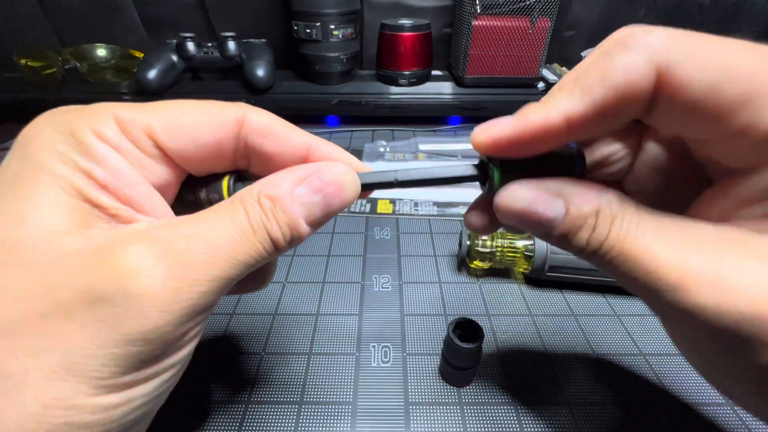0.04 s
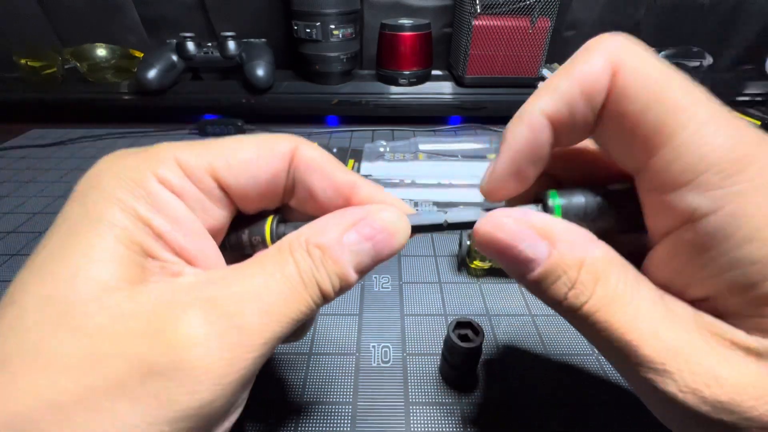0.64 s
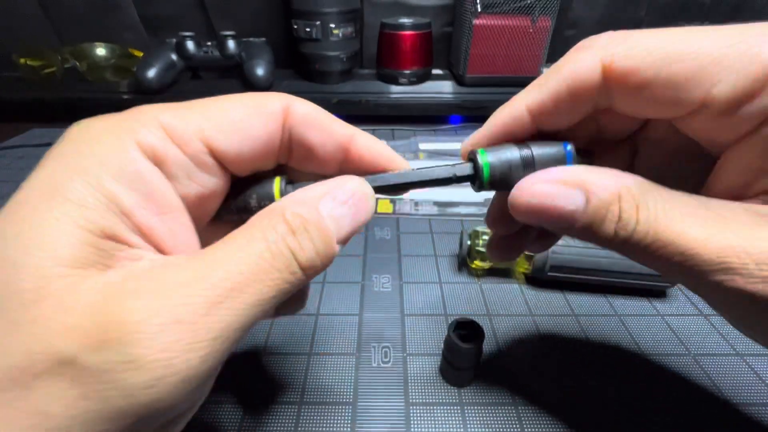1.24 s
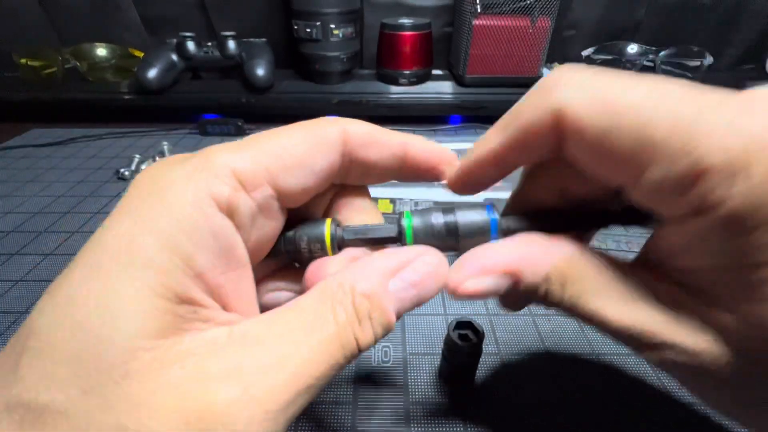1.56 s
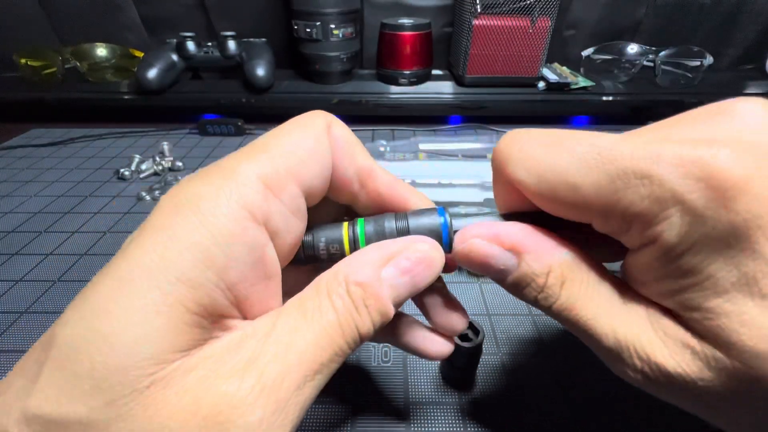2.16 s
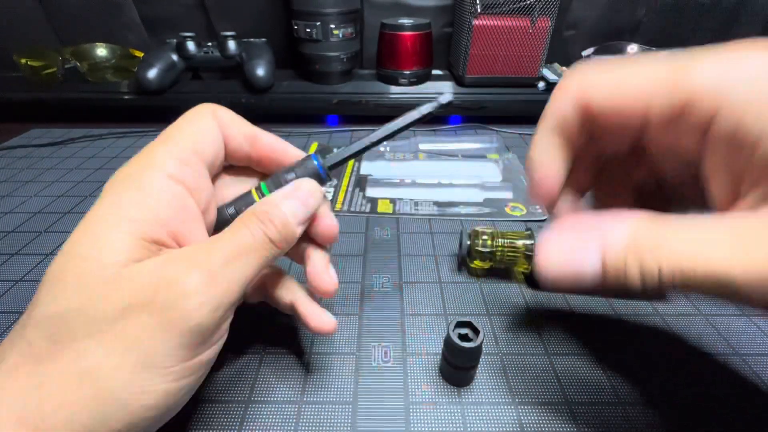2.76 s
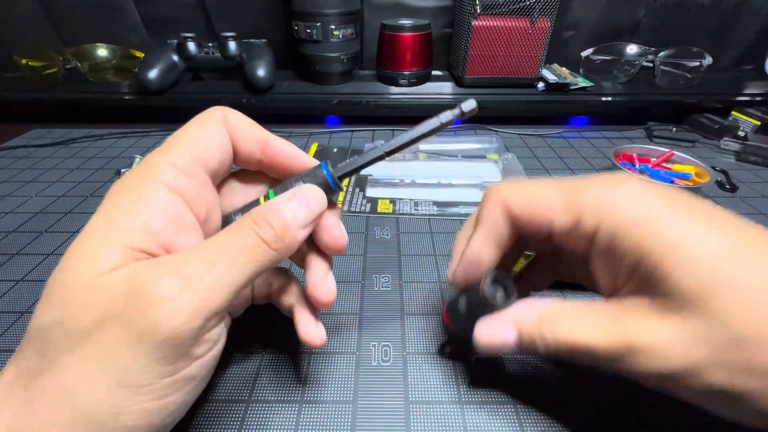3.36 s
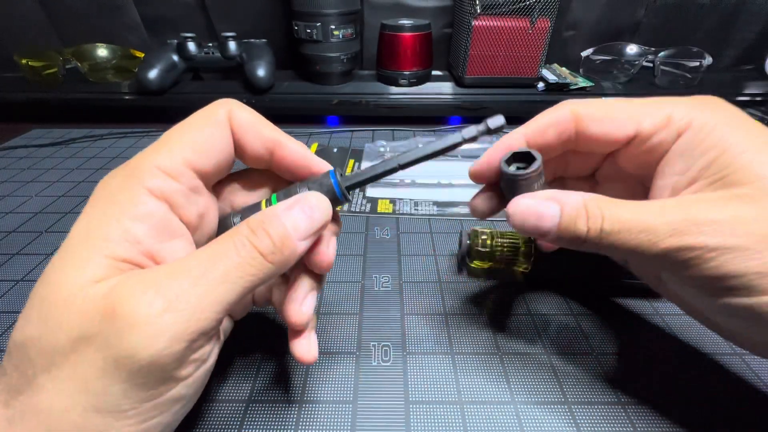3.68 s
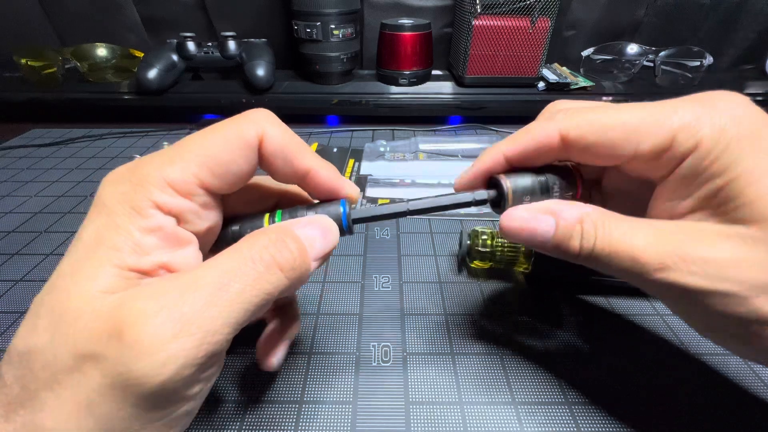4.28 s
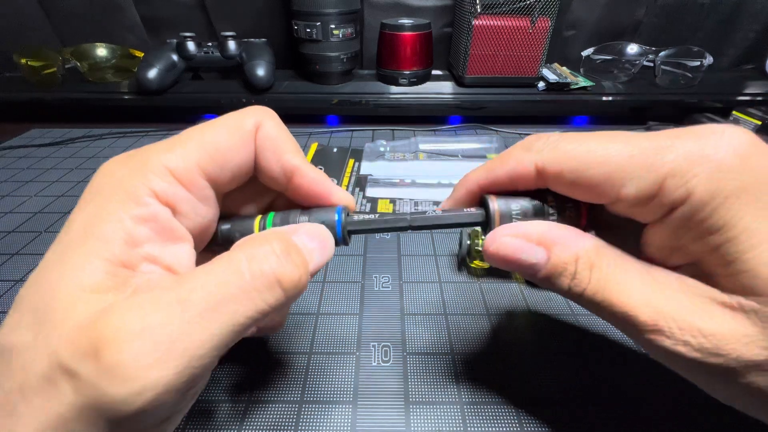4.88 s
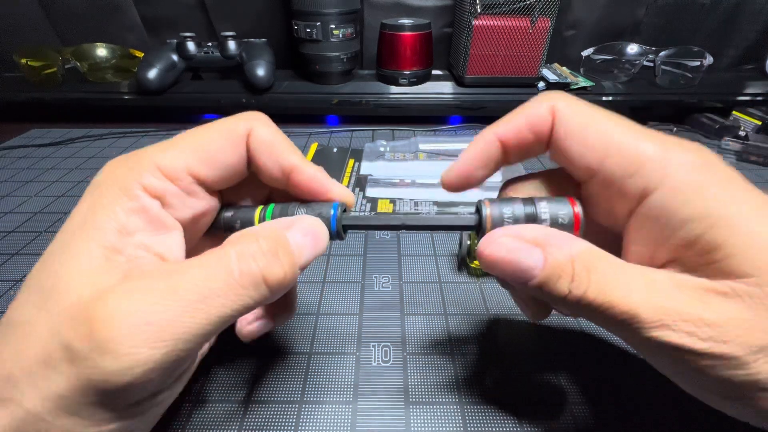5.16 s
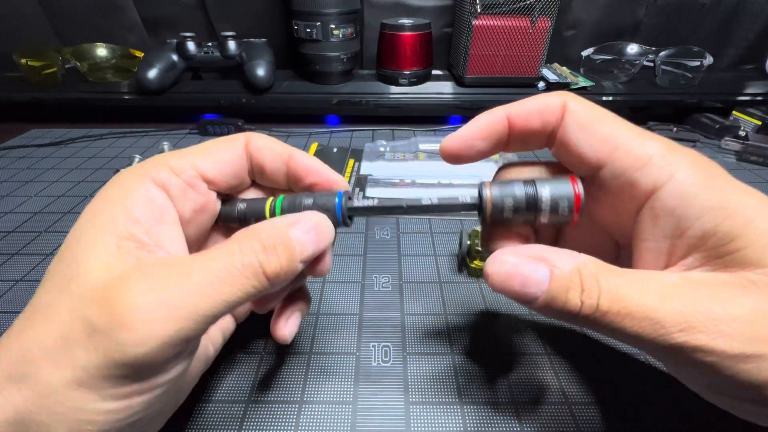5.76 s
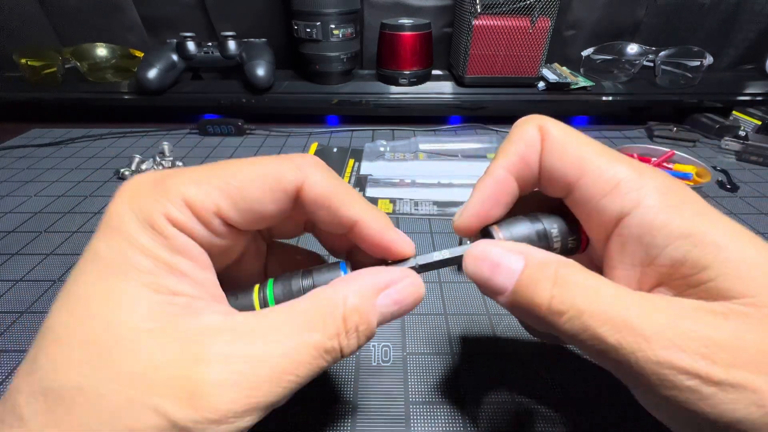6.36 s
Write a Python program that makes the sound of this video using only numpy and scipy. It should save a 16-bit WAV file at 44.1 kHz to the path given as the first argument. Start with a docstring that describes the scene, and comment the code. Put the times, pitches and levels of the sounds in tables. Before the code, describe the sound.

Small steel sockets click, scrape and snap off and onto a metal shaft, close up, over a faint fan hum.

```python
"""Close microphone, small room: steel sockets are pulled off and pushed onto a hex shaft just above a desk.
A click and a grainy, faintly ringing slide open; at 0.75 s a hard snap leaves the loose parts buzzing
and the desk shaking. More slides and snaps follow, each ring damped at once by the fingers. After 3.1 s
the large socket is in hand: it scrapes over the shaft tip near 4 s and snaps on near 4.75 s. Light
clicks, a last slide and a shake of the desk come just after 6 s. A fan hums faintly throughout."""
import sys
import numpy as np
from scipy import signal
from scipy.fft import rfft, irfft, next_fast_len
from scipy.io import wavfile
from scipy.ndimage import uniform_filter1d, map_coordinates

SR = 44100
rng = np.random.default_rng(int(sys.argv[2]) if len(sys.argv) > 2 else 0)


def materialize(psi):
    """Save the field psi as 16-bit PCM at rate SR to the path in sys.argv[1].

    A 1-D psi becomes a single channel; in a 2-D psi each row is a channel.
    """
    bounded = np.clip(np.atleast_2d(psi).T, -1, 1)
    quanta = np.round(bounded * 32767).astype(np.int16)
    wavfile.write(sys.argv[1], SR, quanta)


N = 283122


# steel striking steel, close to the microphone: t/s, chatter length/s, relative level/dB, body/dB,
# treble tilt/(dB per octave), ping f/Hz, its lift/dB, second ping f/Hz, its lift/dB
CONTACTS = [(.0066, 0.0015, 2, -2, -9.5, 2240, 14.5, 5000, 6),
            (0.018, 0.0039, -10.5, -7.5, -23, 11200, 23, 5270, -1),
            (0.227, 0.00089, -48, 2, 0, 10770, 16, 8500, 6), (0.364, .003, -29, 8, -14, 5940, 12, 3440, 4),
            (0.5144, .0029, -22, 4, -2, 2400, 7.5, 6330, 14.5),
            (0.7453, .0007, 10, -11.5, -6.5, 15000, 13, 5000, 3),
            (0.7474, .0016, -4.5, 1, -1, 4900, -2, 2600, -5), (.7497, .0018, -6, 2, -9, 2500, 2, 10400, 15),
            (0.7523, 0.0007, -0.5, -4, -4, 6900, 13, 14000, 16),
            (0.7553, .0032, -7, 1.5, -7, 1610, 5, 10800, 8),
            (0.7655, 0.0022, -12.5, 0.5, -8, 6400, 15, 1410, 0),
            (0.7708, .0022, -12.5, -1, -9, 6200, 15, 3010, 10),
            (0.7793, .003, -23, 2, -10, 2640, 6, 5600, 6), (0.786, .003, -22, 3.5, -7, 3010, 4, 6860, 8),
            (1.19, .0018, -39, 2, -15.5, 5310, 7.5, 3000, -3),
            (1.368, 0.002, -4, -3, 1, 10740, 15.5, 11830, 0),
            (1.3692, 0.00053, 4, -21, -7, 4430, 9, 5900, 8.5),
            (1.7653, .002, -38.5, 4.5, -14.5, 5000, 14, 6790, 6.5),
            (2.0608, 0.0013, -1.5, -20.5, -2.5, 10770, 16.5, 4230, 10.5),
            (2.0612, .003, -8.5, -4, -10, 1220, 23.5, 6750, 16),
            (2.105, 0.0022, -9.5, -10.5, -6, 4300, 8, 6300, 9),
            (2.177, 0.0016, -36.5, 10, -23, 5770, 17, 3000, -5),
            (2.203, .003, -37, 10.5, -20, 5000, 14, 3400, -6.5),
            (2.242, .004, -29, 10.5, -13, 4700, 7, 6500, 5), (2.291, .0043, -23, 9, -20, 5270, 6, 11500, 1),
            (2.336, .0029, -16.5, 3, -24, 4500, -1, 11900, 3),
            (2.372, 0.0062, -14, 8, -22.5, 4170, -3, 11950, 16.5),
            (2.484, .002, -35.5, -2.5, -2, 2540, 4, 6000, 8),
            (2.509, .0024, -29.5, 4.5, -8, 4970, 11, 6500, 0),
            (2.548, 0.00089, -32.5, 14, -0.5, 2480, 3, 7000, -2),
            (2.984, .003, -45.5, -2.5, -11, 6200, 17, 4000, 1),
            (3.23, 0.0079, -39.5, 13, -19.5, 3400, 13, 5250, 4),
            (3.25, 0.0084, -43.5, 12.5, -22, 3290, 11.5, 5200, 4),
            (3.6992, .0014, -36, 4.5, -24, 2150, 12, 4000, 11),
            (3.726, 0.0016, -47, -3.5, -8.5, 9000, 16, 4300, 3),
            (3.805, 0.0016, -22.5, -6.5, -14, 5190, 2, 3900, 9),
            (3.853, 0.0015, -25.5, -14, -30, 5420, 6, 3900, -4),
            (4.108, .0023, -21.5, -8, -19.5, 5400, 12, 3300, -2),
            (4.1642, .0018, -23, -7, -28, 5400, 4, 3780, 8),
            (4.231, 0.0018, -15.5, -7.5, -13, 2900, 7, 8200, 10.5),
            (4.4294, 0.0018, -18.5, -5, -8.5, 3420, 9.5, 9640, 9),
            (4.676, .0049, -29, 11, 0, 2470, 9, 3100, 9),
            (4.738, 0.0055, -18.5, -17, -4.5, 3200, 17.5, 13800, 14),
            (4.7402, 0.006, -19, 5, -16, 4530, 11, 6660, 12),
            (4.751, .007, -24.5, 6.5, -9, 4600, 10, 6550, -1),
            (4.7632, 0.0024, -13, 5, -24, 2270, 10, 10800, 26),
            (4.7685, 0.0031, -19, 7.5, -6, 880, 11.5, 2340, 13.5),
            (4.839, 0.0018, -29, 2, -16, 4540, 9, 9600, 13),
            (6.1295, 0.0032, -31.5, -3, -5, 6400, 13, 4200, 1.5),
            (6.134, 0.0016, -27, 5, -5, 6150, 18, 4300, 1.5),
            (6.2107, 0.0025, -41, 12.5, -1, 2900, 17.5, 7000, 7)]
# colour of a plain contact: f/Hz, level/dB
CONTACT_COLOUR = [(250, -9.5), (1100, -1), (2400, -6.5), (5000, -4.5), (11000, -0.5), (15000, -4.5)]
# resonances of the small sockets and of the large one: f/Hz, width/Hz, lift/dB
SMALL_SOCKET_MODES = [(1200, 450, 0.5), (2410, 610, 8.5), (3130, 260, 7.5), (4500, 700, 5),
                      (5400, 490, 4.5), (6660, 270, 1.5), (8800, 800, 3.5), (11400, 650, 2),
                      (15600, 1600, 10.5)]
LARGE_SOCKET_MODES = [(915, 430, 7), (2376, 640, 13), (3300, 380, 7.5), (4200, 560, -0.5), (5000, 420, 8),
                      (5400, 390, 3), (6850, 740, 8), (8830, 460, 4.5), (9600, 550, 8), (10800, 550, 4.5),
                      (15200, 1100, 18)]
LARGE_FROM_S = 3.1  # the large socket is picked up
BODY_FULL_HZ, BODY_GONE_HZ, TILT_FROM_HZ = 1270, 4860, 5400
PING_Q, FINGER_DAMP_HZ = 7.5, 170  # the fingers widen every ping
PING_CARRY = 0.35  # share of a ping's lift that carries into the room


def clicks(size=2048, bounce_db=-21, bounce_t60=0.056, level_db=-1):
    """Tiny collisions, then a weak rattle, ring the damped steel: heard close, and sent into the room."""
    tracks = np.zeros((2, N))
    hz = np.fft.rfftfreq(size, 1 / SR)
    lead = size // 8 / SR
    t = np.maximum(np.arange(size) / SR - lead, 0)
    window = signal.windows.tukey(size, 1 / 5)
    small_db, large_db = mode_lift(hz, SMALL_SOCKET_MODES), mode_lift(hz, LARGE_SOCKET_MODES)
    body = along([(BODY_FULL_HZ, 1), (BODY_GONE_HZ, 0)], hz)
    octaves = np.log2(np.maximum(hz / TILT_FROM_HZ, 1))
    for s, length, db, body_db, tilt_db, hz1, lift1, hz2, lift2 in CONTACTS + ticks():
        u = 2 * t / length
        blow = (u * np.exp(1 - u)) ** 2
        rattle = (1 - np.exp(-u)) * amp(bounce_db - 60 * t / bounce_t60)
        burst = rfft((blow + rattle) * rng.standard_normal(size))
        # the collisions ripple the spectrum finely but spread their energy evenly over it
        burst /= np.sqrt(abs(uniform_filter1d(abs(burst) ** 2, size=28)) + 1e-12)
        colour_db = along(CONTACT_COLOUR, hz) + body_db * body + tilt_db * octaves
        socket_db = large_db if s > LARGE_FROM_S else small_db
        # the point of contact decides which modes stand out
        pings = [(f, f / PING_Q + FINGER_DAMP_HZ, lift) for f, lift in ((hz1, lift1), (hz2, lift2))]
        ping_db = mode_lift(hz, pings)
        for track, share in zip(tracks, (1, PING_CARRY)):
            click = irfft(burst * causal(amp(colour_db + socket_db + share * ping_db)))
            add(track, s - lead, amp(db + level_db) * click * window)
    return tracks


# a socket slides along the shaft or rebounds from a snap: fastest at t/s, rise/s, fall/s,
# rub level/dB, relative hiss/dB, ring f/Hz, ring over rub/dB
STROKES = [(0.345, 0.076, 0.066, -64, -0.5, 5800, -25), (.43, 0.09, 0.083, -75.5, -4, 5230, -9.5),
           (.535, 0.053, 0.15, -72.5, -14.5, 6520, -4), (.881, 0.049, 0.061, -64, -20.5, 4400, -8.5),
           (1.06, .15, .3, -72.5, -3, 7204, -11), (1.352, .045, .02, -58.5, -6, 4550, 2),
           (1.358, 0.039, 0.028, -53, 9, 11000, 3.5), (1.387, 0.0093, 0.036, -48.5, -2.5, 5000, -6),
           (1.62, 0.3, 0.2, -78, -1.5, 4180, -4), (1.779, 0.097, .092, -73, -4.5, 4500, -9),
           (1.94, 0.078, .08, -67, -4.5, 7250, -6), (2.045, 0.12, 0.09, -61.5, -1, 7000, -1),
           (2.085, 0.0096, .052, -51.5, -11.5, 4370, -4), (2.2, 0.092, 0.32, -75, -25, 4400, -2.5),
           (2.389, 0.11, 0.049, -70, -20.5, 2500, -3), (2.56, .078, 0.13, -66.5, -6.5, 4420, -10.5),
           (3.58, .06, 0.047, -81.5, 3, 4380, -3), (3.675, .05, 0.11, -74, -7, 4380, -1),
           (4.249, 0.15, 0.18, -72, -15, 5500, -7), (4.451, 0.071, 0.07, -74.5, -7, 7170, -7.5),
           (4.672, 0.034, 0.12, -69.5, -2.5, 6850, -0.5), (4.701, 0.093, 0.12, -74, -13.5, 2350, 10),
           (4.756, 0.018, 0.023, -51.5, 2.5, 4560, -4), (4.99, .11, 0.14, -71.5, -6.5, 2324, -2.5),
           (6.165, .056, 0.21, -68, -5, 6250, -10), (6.3, 0.13, 0.1, -68.5, -8, 5670, -14.5)]
# spectra of the rub and of its high hiss: f/Hz, level/dB
RUB_SPECTRUM = [(1470, -31.5), (2500, 2.5), (3230, -8.5), (3520, -1.5), (4400, -3), (5970, 0), (7060, -2.5),
                (10000, -5), (13000, -45), (22000, -120)]
HISS_SPECTRUM = [(8000, -23.5), (10000, -8.5), (11400, -9), (13600, -15), (15300, -3), (16500, -20.5)]
# free ringing of the long shaft: f/Hz, width/Hz, level/dB
SHAFT_MODES = [(2150, 34, -2), (2977, 35, 1), (4520, 30, -2.5), (5080, 85, 1.5), (6440, 30, -3.5),
               (6430, 30, -3), (7000, 86, -5.5)]


def sliding(grain_db=1.5, jerk_db=1.5, uneven_db=2.5, hiss_db=0.5, shaft_db=-8, ring_q=9):
    """Steel rubs along steel in a jerky push; roughness makes it grainy, socket and shaft ring faintly."""
    rub, hiss, ring = np.zeros((3, N))
    for s, rise, fall, db, sheen_db, ring_hz, ring_db in STROKES:
        stroke = swell(s, rise, fall, db)
        rub = np.maximum(rub, stroke)
        hiss = np.maximum(hiss, stroke * amp(sheen_db))
        ring += friction_ring(stroke * amp(ring_db), ring_hz, ring_hz / ring_q)
    grain = unit(amp(grain_db * wobble(900) + jerk_db * wobble(230) + uneven_db * wobble(45)))
    steel = noise(RUB_SPECTRUM) + amp(shaft_db) * ringing(noise(RUB_SPECTRUM), SHAFT_MODES)
    return grain * (rub * steel + amp(hiss_db) * hiss * noise(HISS_SPECTRUM) + ring)


def ticks(length_s=0.0018, rub_cap_db=-68, over_rub_db=25, scatter_db=1, ping_hz=5000):
    """Each sliding stroke catches once along its way: faint contacts, in rows like CONTACTS."""
    rows = []
    for s, rise, fall, db, _, ring_hz, _ in STROKES:
        when, strength = rng.standard_normal(2)
        catch_s = s + np.tanh(when) * (fall if when > 0 else rise) / 2
        tick_db = min(db, rub_cap_db) + over_rub_db + scatter_db * strength
        rows.append((catch_s, length_s, tick_db, 0, -6, ping_hz, 4, ring_hz, 4))
    return rows


# the socket's mouth slips on the shaft tip: t/s, rise/s, relative level/dB, lowest mode/dB, pitch ratio
SCRAPES = [(3.822, 0.011, -55.5, 3.5, 0.97), (3.858, 0.014, -54, 1.5, .995), (3.88, 0.019, -60.5, -1, 1),
           (3.955, .028, -74, 4.5, 1.018), (4.008, .012, -68, 10, 1), (4.028, .012, -60, 1, 0.97),
           (4.082, 0.0067, -63.5, 8, .975), (4.091, .005, -48, -2, .985), (4.104, .008, -46, -6, .99),
           (4.121, 0.014, -56, -13, 1), (4.155, 0.02, -62, -7, 0.96)]
# the singing rim: f/Hz, width/Hz, level/dB
RIM_MODES = [(3900, 710, -3), (4730, 2500, -10), (5500, 140, -3.5), (6800, 900, -21.5),
             (11500, 1100, -24.5)]
# its dry rasp: f/Hz, level/dB
GRIT_SPECTRUM = [(1500, -24.5), (2600, -4.5), (3400, 0), (5200, -3.5), (7500, -9.5), (10000, -13),
                 (15000, -32)]


def scraping(grain_db=4, level_db=-3, grit_db=-11, grit_grain_db=1.5, fall_over_rise=1.63):
    """The rim catches and slips: dry rasps with a short ring whose pitch and balance follow the grip."""
    slips = np.zeros(N)
    grit = amp(grit_db) * unit(noise(GRIT_SPECTRUM) * amp(grit_grain_db * wobble(1100)))
    for s, rise, db, lowest_db, pitch in SCRAPES:
        pressure = swell(s, rise, fall_over_rise * rise, db + level_db)
        slips += pressure * grit
        for k, (hz, width, mode_db) in enumerate(RIM_MODES):
            slips += friction_ring(pressure * amp(mode_db + lowest_db * (k == 0)), pitch * hz, width)
    return slips * unit(amp(grain_db * wobble(400)))


# chatter of the loose steel: f/Hz, level/dB
BUZZ_SPECTRUM = [(250, -18), (550, -2.5), (1000, -4.5), (1400, -3), (2000, -10.5), (2700, -1.5),
                 (3700, -3.5), (6300, -0.5), (9000, -3), (12000, -12), (16000, -19)]
HARD_SNAP_S = 0.753


def buzzing(level_db=-33, t60=0.21, rise=0.009, shaft_db=-6, grain_db=3.5, rattle_db=0.5):
    """After the hard snap the loose parts chatter in quick clumps, keep the shaft ringing, and settle."""
    t = np.maximum(np.arange(N) / SR - HARD_SNAP_S, 0)
    chatter = unit(noise(BUZZ_SPECTRUM) * amp(grain_db * wobble(600) + rattle_db * wobble(170)))
    fade = (1 - np.exp(-t / rise)) * amp(level_db - 60 * t / t60)
    return fade * (chatter + amp(shaft_db) * ringing(chatter, SHAFT_MODES))


# the socket against the fingers: f/Hz, level/dB
SETTLE_SPECTRUM = [(200, -7), (400, 3), (700, -1.5), (1400, -2), (2200, -6), (3100, -4.5), (5000, -13.5),
                   (9000, -30), (16000, -49)]


def settling(delay=0.125, rise=0.082, fall=0.032, level_db=-58, rattle_db=3):
    """As the buzz dies, the socket goes on rattling softly and dully in the hand."""
    rattle = unit(noise(SETTLE_SPECTRUM) * amp(rattle_db * wobble(130)))
    return swell(HARD_SNAP_S + delay, rise, fall, level_db) * rattle


# soft bumps of hands and tool at the desk: t/s, thud level/dB, knock level/dB, thud t60/s
BUMPS = [(0.0186, -20.5, -41, 0.073), (0.516, -45, -38, 0.02), (0.746, -42, -32, 0.05),
         (0.76, -32, -37, 0.16), (0.778, -41.5, -40, 0.22), (0.799, -51, -33.5, 0.33),
         (.849, -40, -30.5, 0.15), (0.927, -53, -44.5, 0.08), (0.944, -36.5, -35, 0.1),
         (4.742, -42.5, -55, 0.087), (4.764, -36, -44, 0.18), (4.842, -36, -67, 0.14)]
# spectra of the thud and the knock: f/Hz, level/dB
THUD_SPECTRUM = [(15, -12), (35, -6.5), (75, 3), (140, -4), (260, -11), (600, -54.5), (2000, -120)]
KNOCK_SPECTRUM = [(120, -24.5), (280, -1), (420, 1.5), (560, -10), (720, -18), (1150, -18), (2500, -54),
                  (6000, -100)]


def bumps(knock_t60=0.055, rise=0.0024):
    """Dull jolts, slightly left of centre: a low thud and a wide, hollow knock."""
    thuds, knocks = np.zeros((2, N))
    t = np.arange(SR // 2) / SR
    onset = 1 - np.exp(-t / rise)
    for s, thud_db, knock_db, t60 in BUMPS:
        add(thuds, s, onset * amp(thud_db - 60 * t / t60))
        add(knocks, s, onset * amp(knock_db - 60 * t / knock_t60))
    thud = thuds * noise(THUD_SPECTRUM)
    knock = knocks * np.array([noise(KNOCK_SPECTRUM), noise(KNOCK_SPECTRUM)])
    return amp([[1], [-1]]) * (thud + knock)


# the desk shakes: strongest at t/s, rise/s, fall/s, level/dB
DESK_SHAKES = [(.788, .04, 0.077, -32.5), (6.24, 0.12, .14, -44)]
# its rumble: f/Hz, level/dB
DESK_SPECTRUM = [(15, -12.5), (35, 0.5), (68, 4.5), (120, -12.5), (400, -59), (1500, -120)]


def desk_shudder():
    """Sudden moves jerk the hands, and the desk under them shakes deeply."""
    return sum(swell(*shake) for shake in DESK_SHAKES) * noise(DESK_SPECTRUM)


# the hands shift their grip near the microphone: t/s, rise and fall/s, level/dB
GRIPS = [(.92, 0.51, -67.5), (2.15, 0.42, -64), (2.86, 0.3, -71.5), (3.16, .15, -75), (3.39, .22, -68.5)]
# brushing skin: f/Hz, level/dB
SKIN_SPECTRUM = [(300, -22.5), (800, 5), (1400, -2), (2300, -6), (4000, -24.5), (10000, -37)]


def brushing(uneven_db=2, rest_db=-86):
    """Skin moves softly over the tool and the desk mat."""
    motion = amp(rest_db) + sum(swell(s, length, length, db) for s, length, db in GRIPS)
    return motion * amp(uneven_db * wobble(17)) * noise(SKIN_SPECTRUM)


# room tone, the fan's moving air: f/Hz, level/dB
AIR_SPECTRUM = [(20, -31.5), (38, -4.5), (85, 0.5), (140, -3), (190, -2), (330, -10.5), (520, -20),
                (700, -23), (1190, -25.5), (1900, -33.5), (3400, -46.5), (6300, -47.5), (10000, -56),
                (16000, -73.5)]
# how alike that air is on the two channels: f/Hz, correlation
AIR_CORRELATION = [(60, 1), (150, 1), (380, -0.25), (950, -0.35), (2380, -0.28), (5980, -0.59),
                   (15000, -0.063)]
# fan resonances: f/Hz, nominal width/Hz, level/dB
FAN_MODES = [(63, 11, -47), (104, 7.6, -52.5), (127.6, 30, -51), (273.7, 9.6, -63.5), (292.4, 22, -64.5),
             (373.8, 30, -70.5), (859, 62, -74)]


def fan(air_db=-50, hum_side_db=-13, lean_db=0.87, blade_hz=220.86, blade_db=-51, waver_db=1):
    """In the background: low moving air, a few narrow resonances and the steady tone of the blades."""
    def mid_side(hz):
        angle = np.arccos(np.clip(along(AIR_CORRELATION, hz), -1, 1)) / 2
        return np.array([np.cos(angle), np.sin(angle)])

    def hum_peaks(hz):
        return sum(amp(db) * abs(resonance(hz, centre, 0.94 * width)) ** 2 * np.sqrt(SR / 2 / width)
                   for centre, width, db in FAN_MODES)

    air = filtered(np.array([noise(AIR_SPECTRUM), noise(AIR_SPECTRUM)]), mid_side)
    hum = filtered(rng.standard_normal((2, N)), hum_peaks)
    blade_gain = amp(blade_db + waver_db * wobble(2.7))
    blade_phase = 2 * np.pi * blade_hz * np.arange(N) / SR + 0.11 * wobble(1.0)
    hum[0] += blade_gain * unit(np.sin(blade_phase))
    mid, side = amp(air_db) * air + hum * amp([[0], [hum_side_db]])
    return np.array([mid + side, mid - side]) * amp([[lean_db], [-lean_db]])


# decay of the small room: f/Hz, t60/s
ROOM_DECAY = [(200, 0.33), (1200, 0.25), (5000, 0.17), (9000, 0.24), (15000, 0.14)]
# strength of its answer at the microphone: f/Hz, level/dB
ROOM_LEVEL = [(200, -9.5), (1200, -6.5), (2400, -11), (5000, -13), (8000, -13), (11000, -18.5),
              (15000, -29)]


def room(x, gap_s=0.0025, stretches=16):
    """The small room's tail; the treble dies first, and the moving hands keep changing its paths."""
    wet = np.zeros((2, N))
    for part in np.array_split(np.arange(N), stretches):
        hz, t, spectra = signal.stft(rng.standard_normal((2, SR // 2)), SR, nperseg=256)
        fade = amp(-60 * t / along(ROOM_DECAY, hz)[:, None])
        energy = np.mean(fade ** 2, axis=1, keepdims=True) * SR / 2
        fade *= amp(along(ROOM_LEVEL, hz))[:, None] / np.sqrt(energy)
        _, tails = signal.istft(spectra * fade, SR, nperseg=256)
        for channel, tail in zip(wet, tails):
            add(channel, part[0] / SR + gap_s, signal.fftconvolve(x[part], tail))
    return wet


# the tool at the two microphone ports, left minus right: f/Hz, level/dB
PORT_BALANCE = [(700, -0.5), (1200, 3.5), (2200, 6), (3300, 9), (5300, 17.5), (7500, 10.5), (9500, -1.5),
                (15000, 0.5)]


def port_balance(x, lean=1.0):
    """The left microphone port hears the middle treble more strongly."""
    def gains(hz):
        pair = amp(np.outer([0.5, -0.5], lean * along(PORT_BALANCE, hz)))
        return pair / np.sqrt(np.mean(pair ** 2, axis=0))
    return filtered(x, gains)


# the close sound, left port against right: f/Hz, phase/rad
PORT_PHASE = [(500, 2), (3000, 1.51), (6000, -1.35), (8000, -1), (10000, -2.5), (12000, -7), (14000, -8),
              (16000, -13)]


def port_phase(x):
    """The close sound reaches the two ports out of step."""
    return filtered(x, lambda hz: np.exp(np.outer([0.5j, -0.5j], along(PORT_PHASE, hz))))


def swell(s, rise, fall, db, depth_db=17, roundness=0.99):
    """Gain of one movement: it gathers speed up to time s, gaining depth_db over its rise, then slows."""
    t = np.arange(N) / SR - s
    away = np.maximum(-t / rise, t / fall)
    gain, near = np.zeros(N), away < 10
    gain[near] = amp(db - depth_db * away[near] ** roundness)
    return gain


def friction_ring(envelope, hz, width):
    """One mode kept ringing by friction, for as long as the envelope lasts."""
    ring, on = np.zeros(N), envelope > 0
    mode = np.concatenate(signal.iirpeak(hz, hz / width, fs=SR))
    ring[on] = envelope[on] * unit(signal.sosfilt([mode, mode], rng.standard_normal(on.sum())))
    return ring


def ringing(drive, modes):
    """A drive through (f/Hz, width/Hz, level/dB) modes of alternating sign, at rms 1."""
    def response(hz):
        return sum((-1) ** k * amp(db) * resonance(hz, centre, width)
                   for k, (centre, width, db) in enumerate(modes))
    return unit(filtered(drive, response))


def mode_lift(hz, modes):
    """Boost in dB from (f/Hz, width/Hz, lift/dB) modes."""
    return sum(lift * abs(resonance(hz, centre, width)) ** 2 for centre, width, lift in modes)


def resonance(hz, centre, width):
    """Response of one damped mode."""
    return 1j * hz * width / (centre ** 2 - hz ** 2 + 1j * hz * width)


def causal(gain):
    """The response with this gain that rings only after the blow."""
    cepstrum = irfft(np.log(np.maximum(gain, 1e-6)))
    half = len(cepstrum) // 2
    return np.exp(rfft(np.r_[cepstrum[0], 2 * cepstrum[1:half], np.zeros(half)]))


def noise(spectrum):
    """Noise of rms 1 with the given colour."""
    return unit(filtered(rng.standard_normal(N), lambda hz: amp(along(spectrum, hz))))


def filtered(x, response):
    """x through a complex response of frequency."""
    size = next_fast_len(N + SR // 2)
    return irfft(rfft(x, size) * response(np.fft.rfftfreq(size, 1 / SR)), size)[..., :N]


def wobble(rate):
    """A smooth random curve, rate knots a second."""
    return map_coordinates(rng.standard_normal(int(N * rate / SR) + 4), [np.arange(N) * rate / SR])


def along(points, hz):
    """Interpolate (f/Hz, value) points on a log axis."""
    freqs, values = np.transpose(points)
    return np.interp(np.log(hz + 1), np.log(freqs + 1), values)


def add(track, s, sound):
    """Mix a sound into the track at time s."""
    part = track[max(round(s * SR), 0):][:len(sound)]
    part += sound[:len(part)]


def amp(db):
    """Decibels to gain."""
    return 10 ** (np.asarray(db) / 20)


def unit(x):
    """Scale to rms 1."""
    return x / np.sqrt(np.mean(x ** 2) + 1e-20)


def scene():
    """The tool close to the microphone, the desk just below, the room and its fan all round."""
    close, carried = clicks()
    handling = sliding() + scraping() + buzzing() + settling() + brushing()
    direct = port_phase(port_balance(close + handling))
    reflected = port_balance(room(carried + handling), lean=0.54)
    return direct + reflected + bumps() + desk_shudder() + fan()


def record(dry):
    """The recorder keeps nothing above its band limit."""
    top_hz = 16350
    return filtered(dry, lambda hz: 1 / np.sqrt(1 + (hz / top_hz) ** 160))


dry = scene()
out = record(dry)
materialize(out)
```